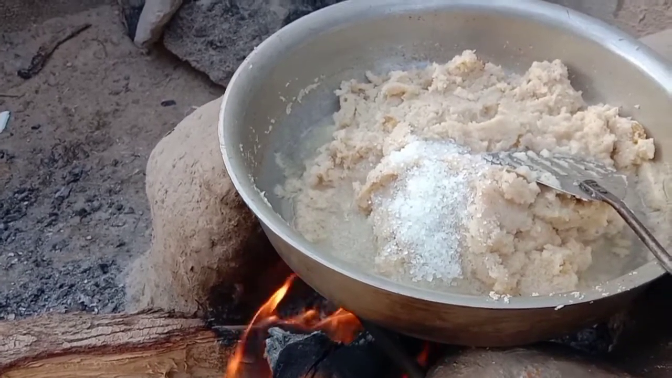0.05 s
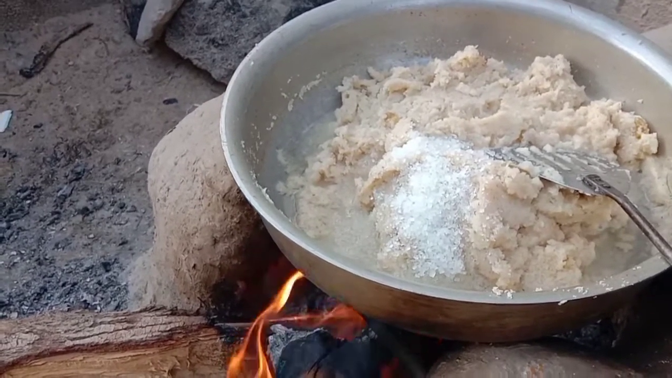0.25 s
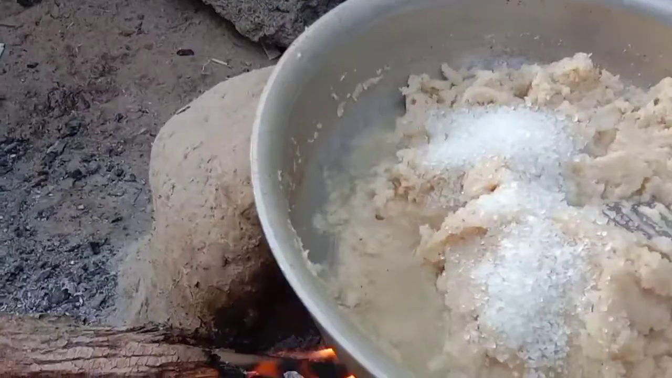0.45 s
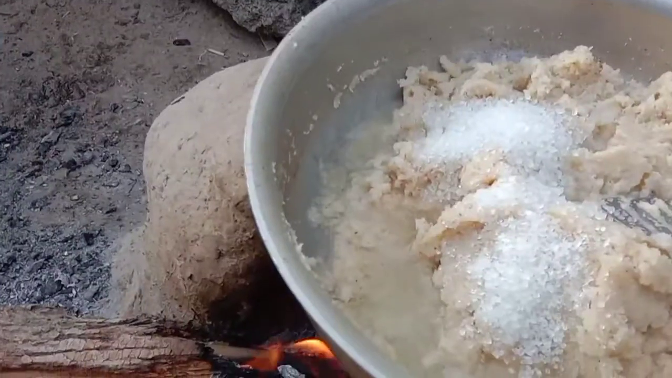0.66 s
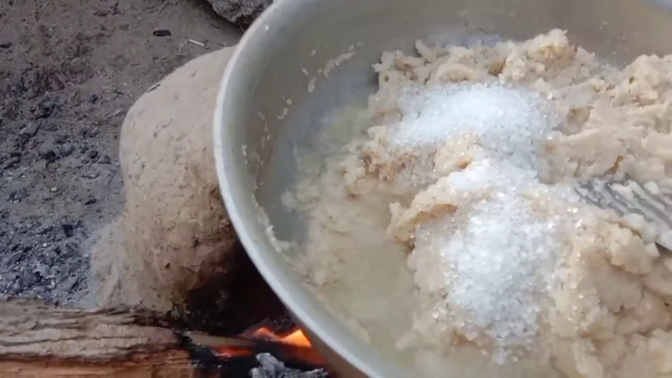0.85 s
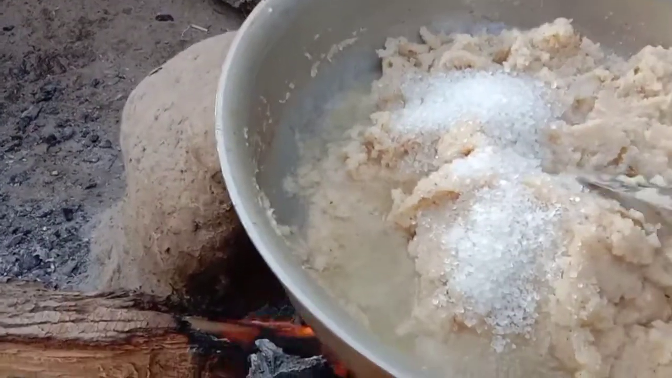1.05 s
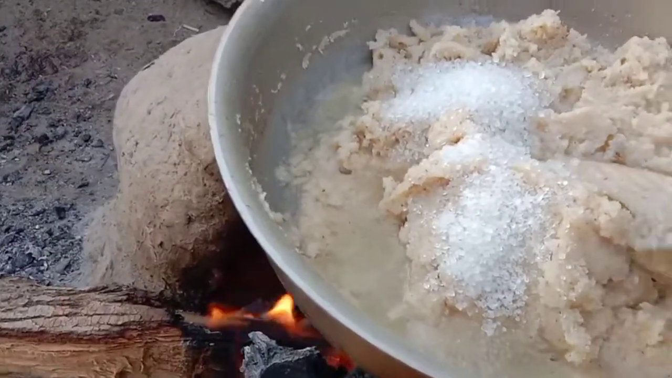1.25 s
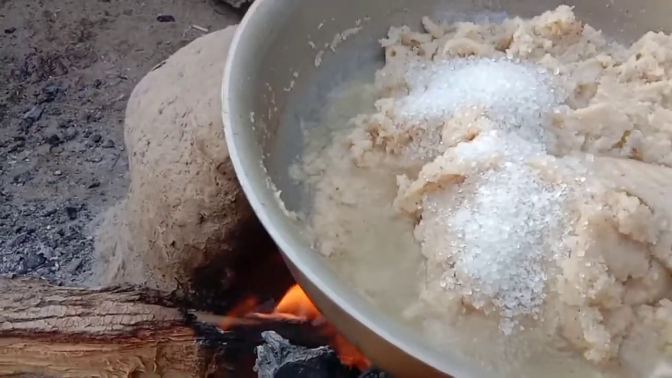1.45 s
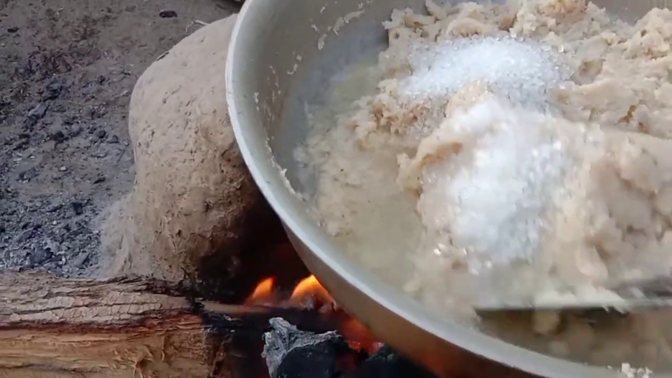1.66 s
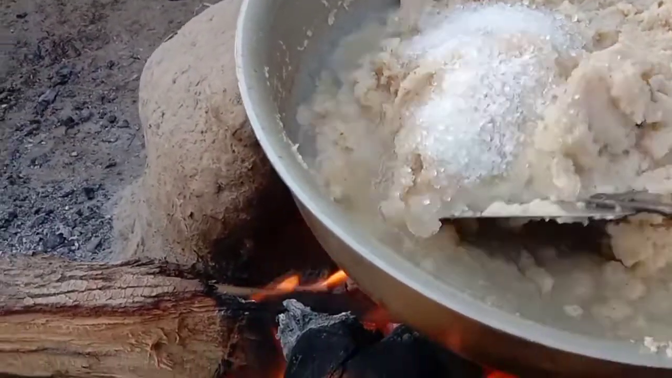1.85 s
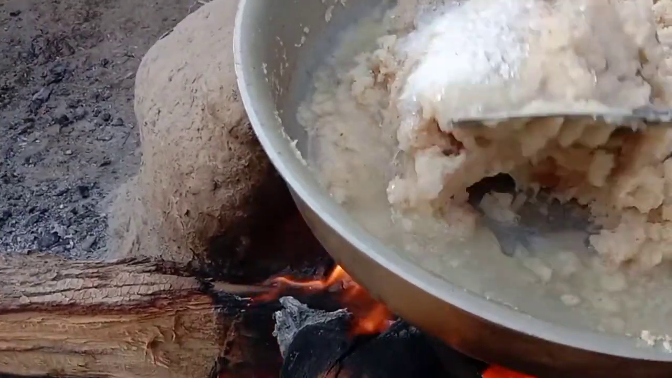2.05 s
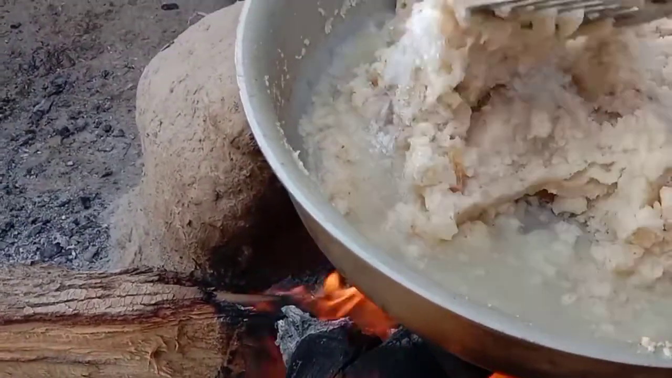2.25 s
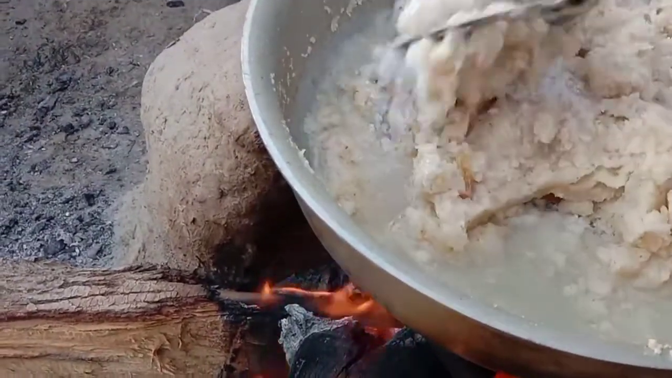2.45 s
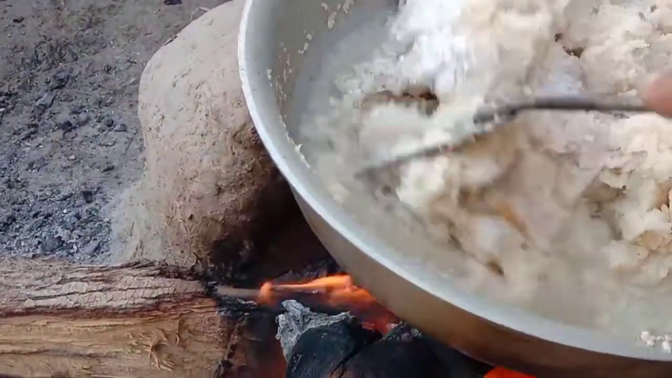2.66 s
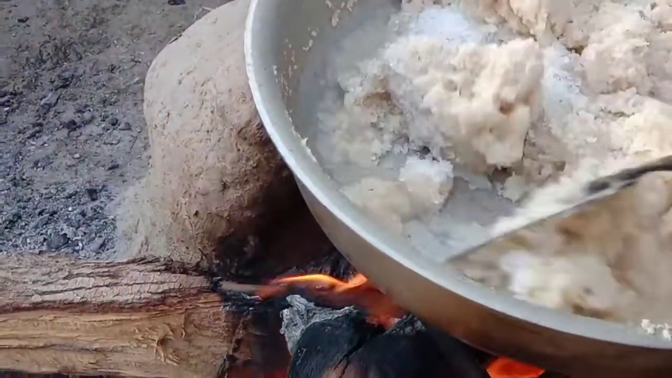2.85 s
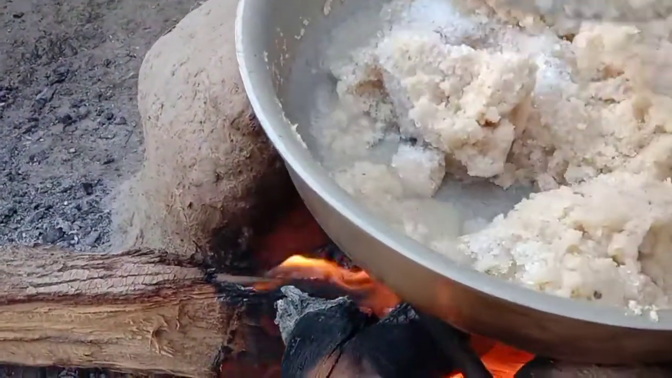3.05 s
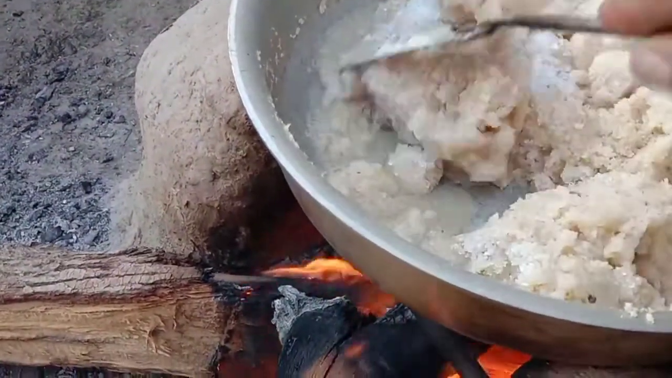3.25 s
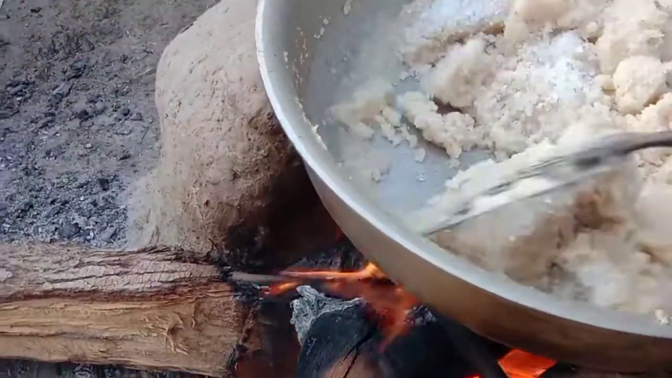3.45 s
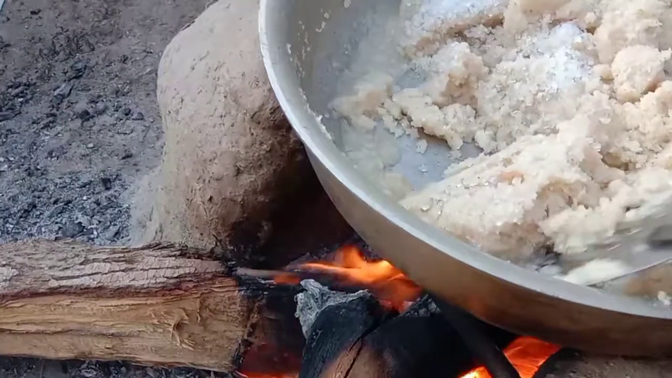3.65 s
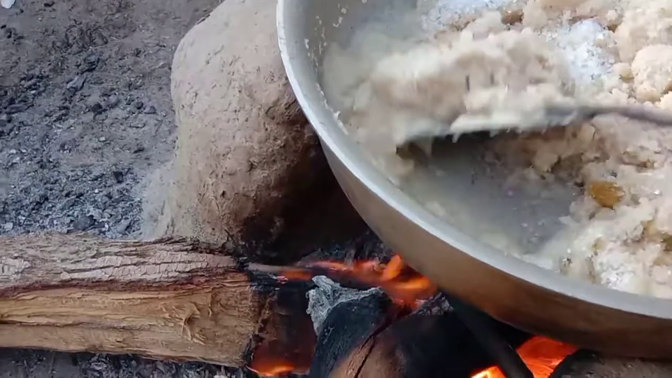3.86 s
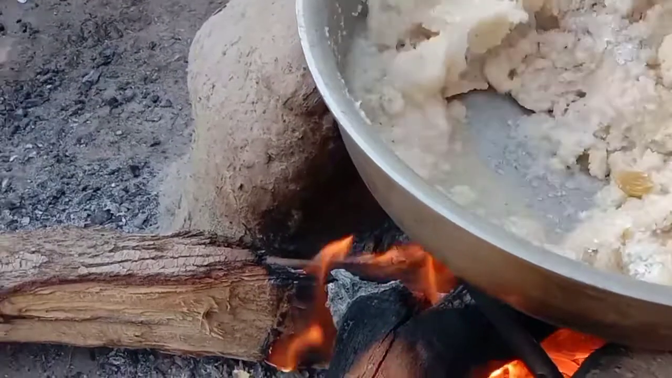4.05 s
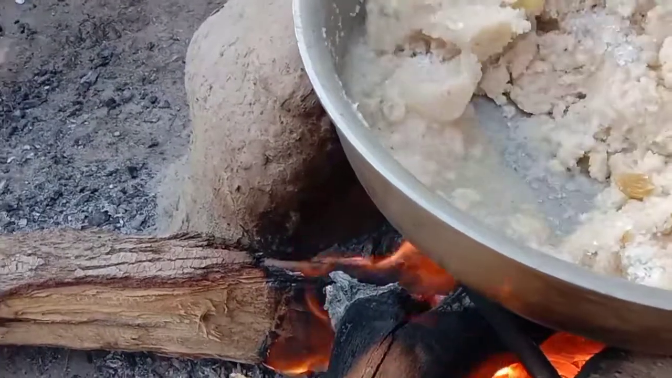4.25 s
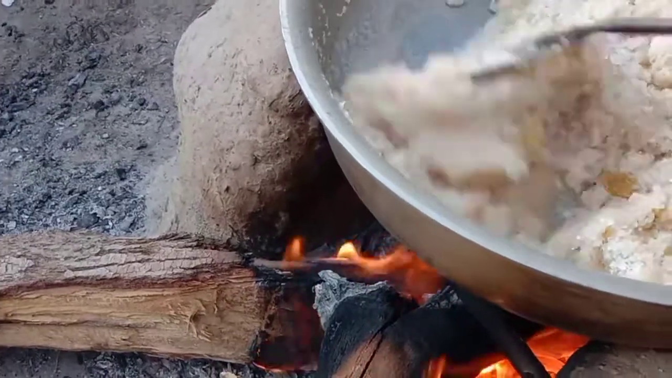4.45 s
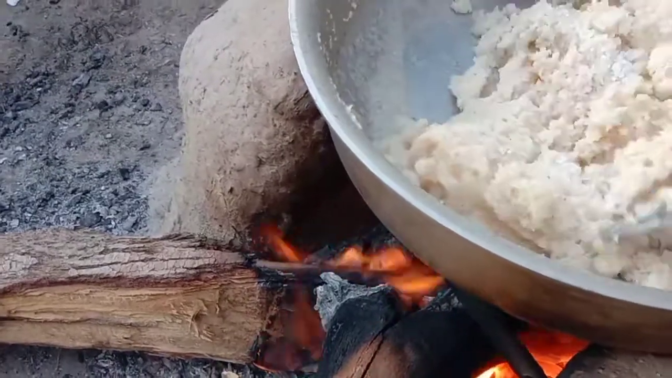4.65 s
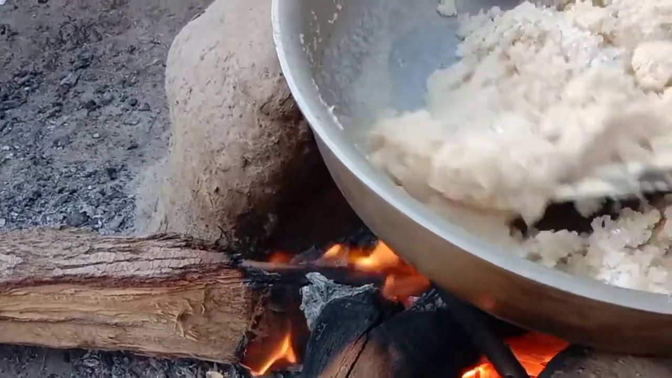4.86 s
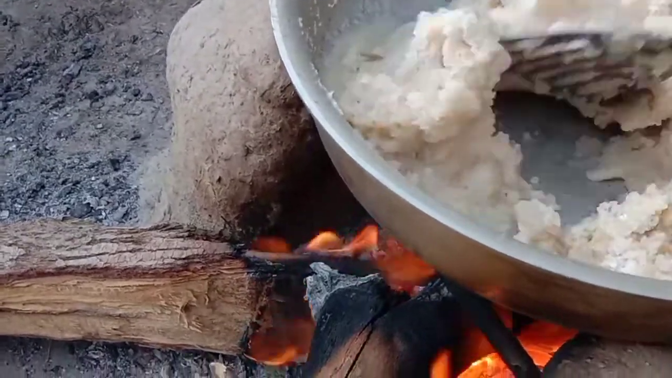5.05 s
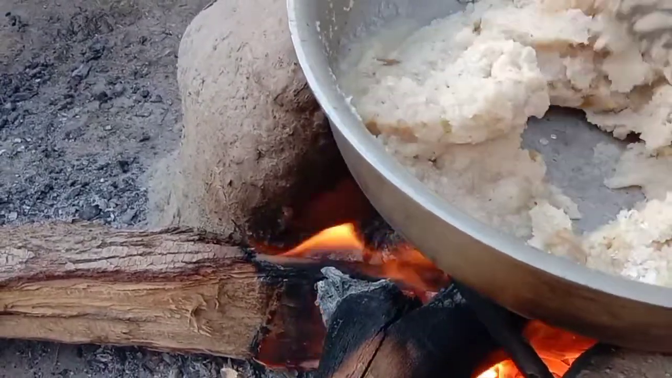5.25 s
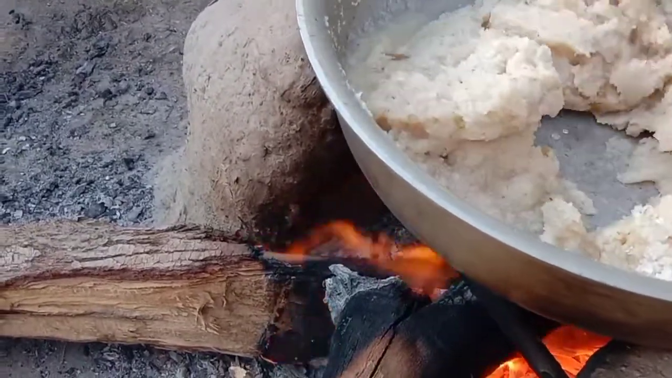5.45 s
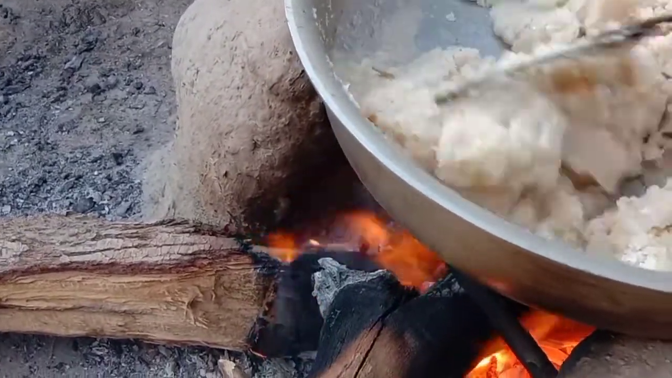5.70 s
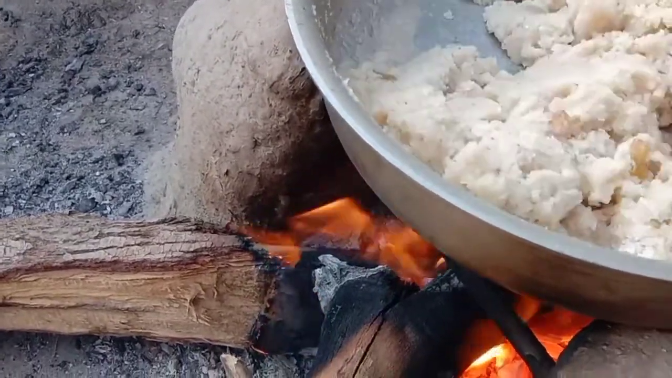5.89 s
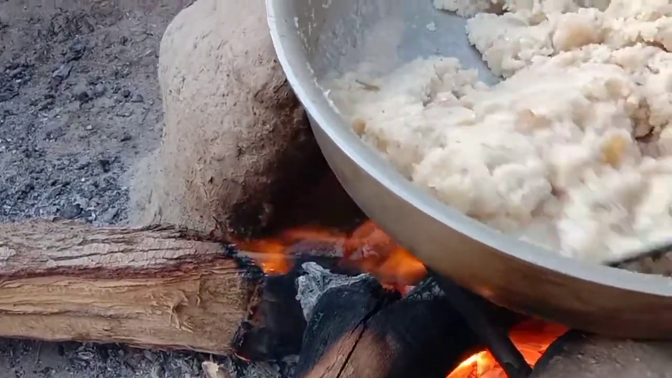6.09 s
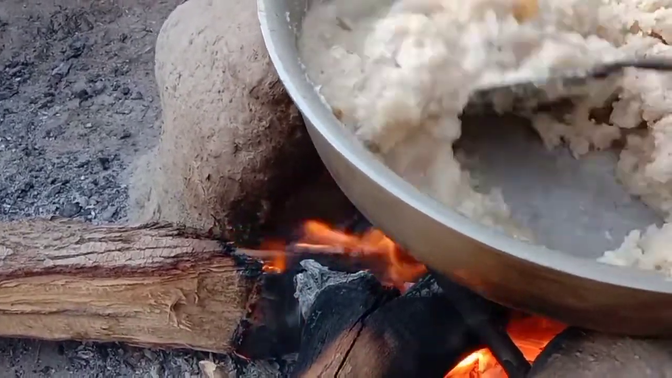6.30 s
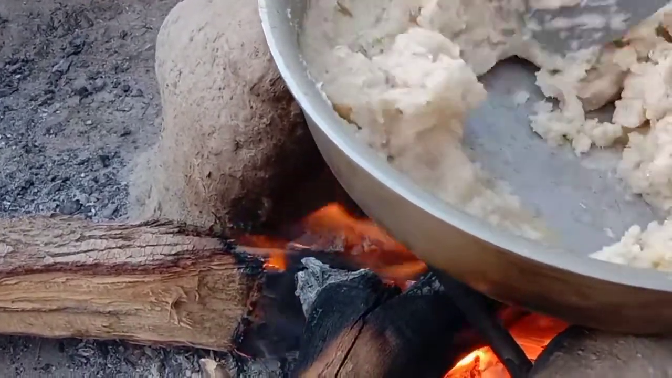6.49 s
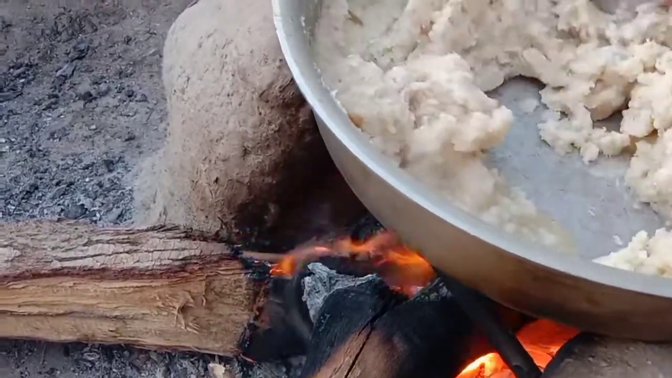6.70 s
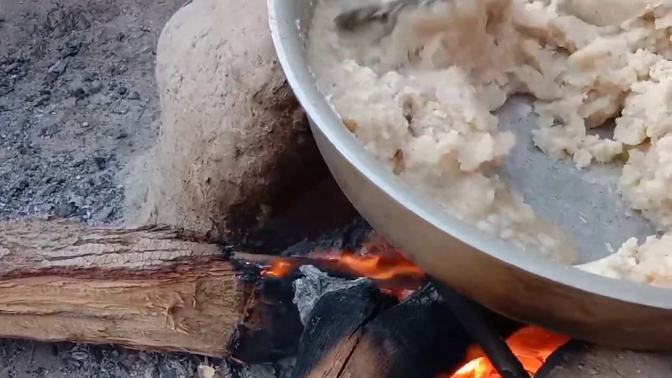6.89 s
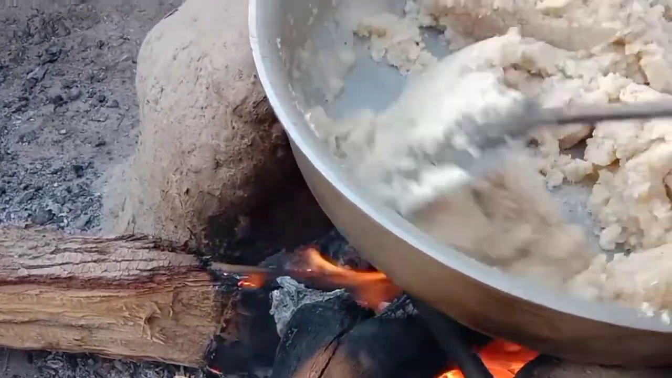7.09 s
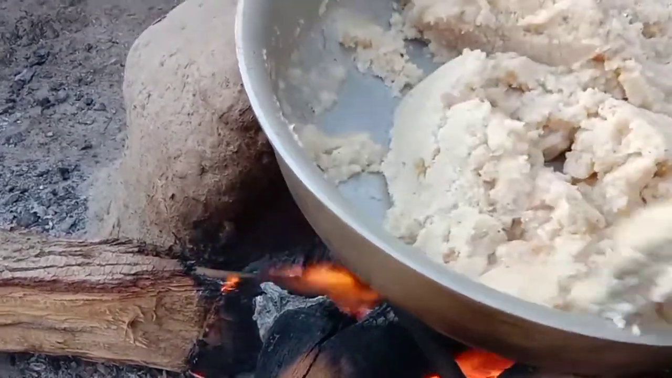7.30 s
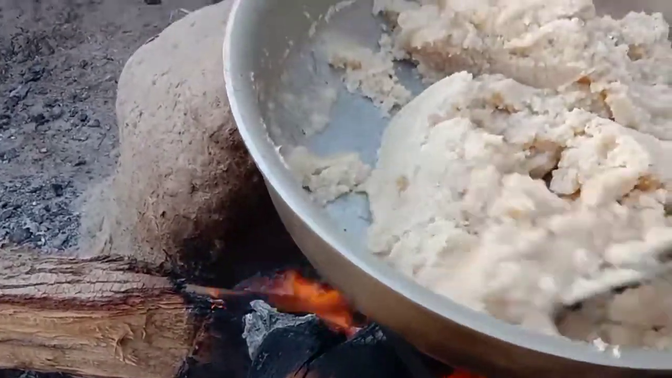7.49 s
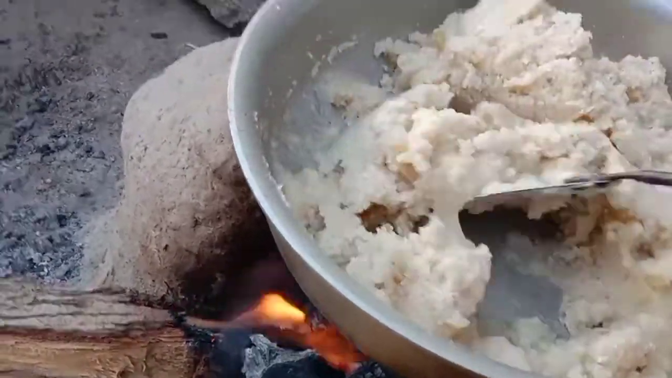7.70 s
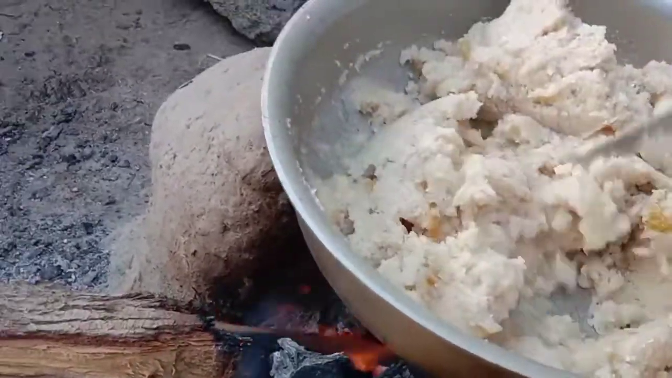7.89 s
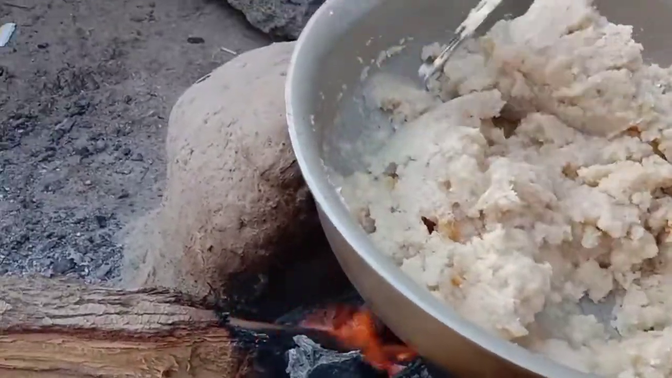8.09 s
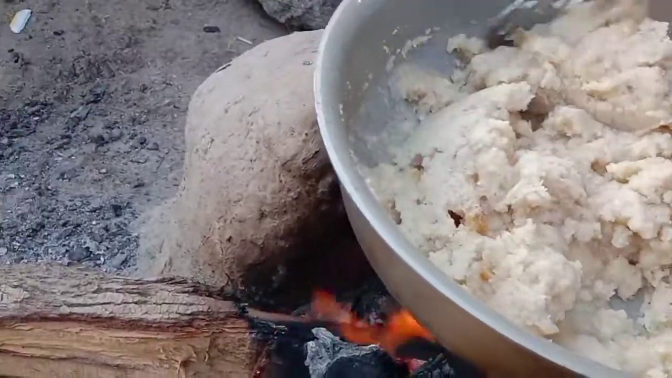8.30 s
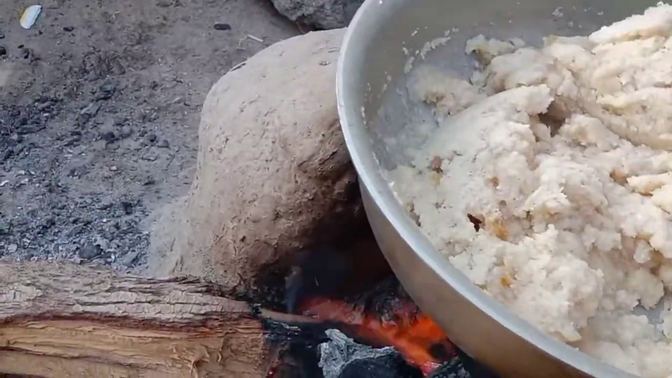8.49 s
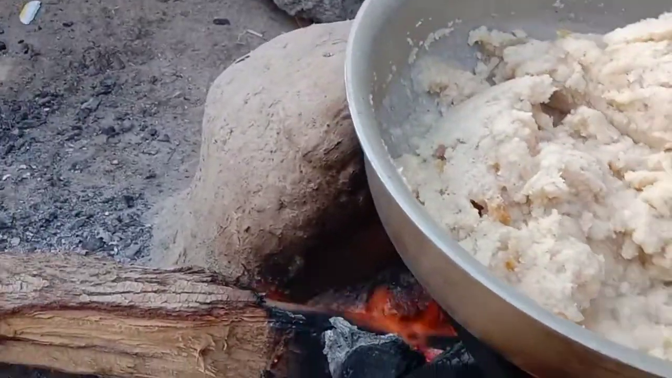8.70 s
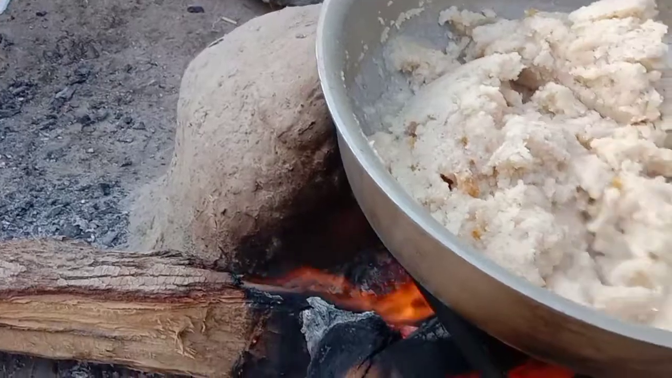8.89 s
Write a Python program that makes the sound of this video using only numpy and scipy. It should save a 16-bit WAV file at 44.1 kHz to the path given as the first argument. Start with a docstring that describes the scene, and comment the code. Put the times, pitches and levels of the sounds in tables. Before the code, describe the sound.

A metal spatula knocks, clinks and scrapes gritty, wet paste in a wide metal pan, with light sizzling and low puffs of wind outdoors.

```python
"""Stirring semolina over a wood fire

Outdoors, close by: a steel spatula turns thick semolina and sugar in a wide metal pan.
The blade knocks on the paste-damped pan, clinks as ringing modes, and scrapes in stick-slip grains over grit.
Filtered bursts of bubbles sizzle throughout; flames and moving air, shaped noise with slowing
low tones, puff low against the microphone. Paste smears and plops, the rim sings, a faint whistle sinks."""
import sys
import numpy as np
from scipy import signal
from scipy.fft import rfft, irfft
from scipy.io import wavfile
from scipy.ndimage import uniform_filter1d, map_coordinates

SR = 44100
rng = np.random.default_rng(int(sys.argv[2]) if len(sys.argv) > 2 else 0)


def unload_audio(sound):
    """Save the sound as a 16-bit wav file, at the path given as the first command line argument."""
    columns = np.transpose(np.atleast_2d(sound))
    # keep every value between -1 and 1, then stretch to whole-number steps
    steps = np.round(np.clip(columns, -1, 1) * 32767)
    wavfile.write(sys.argv[1], SR, steps.astype(np.int16))


N = 394254
T = np.arange(N) / SR
BLOW = T[:SR // 4]  # time axis of a single blow, s


def undb(db):
    """Decibels to gain."""
    return 10 ** (np.asarray(db) / 20)


def unit(x):
    """Scale to rms 1."""
    return x / np.sqrt(np.mean(x ** 2))


def onset_unit(x):
    """Scale a blow to rms 1 over its first hundredth of a second."""
    return x / np.sqrt(np.mean(x[:SR // 100] ** 2))


def curves(table):
    """Each column of a table as a line through time."""
    s, *columns = np.transpose(table)
    return [np.interp(T, s, c) for c in columns]


def add(track, s, sound):
    """Mix a sound in at time s."""
    i = max(int(s * SR), 0)
    track[i:i + len(sound)] += sound[:max(N - i, 0)]


def colour(x, points, size=4096):
    """Causal minimum-phase filter through (f/Hz, level/dB) points."""
    hz, db = np.transpose(points)
    f = np.maximum(np.fft.rfftfreq(size, 1 / SR), 1)
    log_gain = np.log(undb(np.interp(np.log(f), np.log(hz), db)))
    # folding the cepstrum forward puts all of the response after the input
    cepstrum = irfft(log_gain)
    cepstrum[1:size // 2] *= 2
    cepstrum[size // 2 + 1:] = 0
    response = irfft(np.exp(rfft(cepstrum)))
    return signal.oaconvolve(x, response)[:len(x)]


def fade(t60):
    """Exponential decay of a blow, by 60 dB in t60 seconds."""
    return np.exp(-np.log(1000) * BLOW / t60)


def ring(modes, scatter_db, detune):
    """Decaying modes; the place of contact changes their strength, sign and tuning."""
    out = 0
    for hz, t60, db in modes:
        size, shift, side = rng.standard_normal(3)
        gain = np.sign(side) * undb(db + scatter_db * size)
        tone = np.sin(2 * np.pi * hz * (1 + detune * shift) * BLOW)
        out = out + gain * fade(t60) * tone
    return out


def walk(rate):
    """Smooth random wandering with rms 1 and a new target `rate` times a second."""
    knots = rng.standard_normal(4096)
    return unit(np.interp(T * rate, np.arange(len(knots)), knots))


def grains(rate, spread_db):
    """Random tiny impulses, `rate` a second on average; the spread makes a few far larger than the rest."""
    out = np.zeros(N)
    at = np.flatnonzero(rng.random(N) < rate / SR)
    size = rng.exponential(size=N)[at]
    side = rng.random(N)[at] - .5
    out[at] = np.sign(side) * undb(spread_db * np.minimum(size, 5))
    return unit(out)


def rub(drive, modes, rate, detune, glide):
    """Ring a body with a moving contact, which wanders between places that sound differently."""
    place = 1.125 * walk(rate)
    out = 0
    for share in (np.cos(place), np.sin(place)):
        body = ring(modes, scatter_db=4.0, detune=detune)
        out = out + signal.oaconvolve(drive * share, body / np.linalg.norm(body))[:N]
    # the shifting load bends all resonances up and down together
    bend = np.cumsum(glide * walk(rate))
    bend -= uniform_filter1d(bend, SR // 3)
    return map_coordinates(out, [np.arange(N) + bend], order=3, mode="nearest")


# echo between blade and pan: middle delay/s, its relative wandering, level/dB
BOUNCE_S, BOUNCE_SWING, BOUNCE_DB = 0.00058, 0.12, -6


def bounce(x):
    """Sound also arrives by way of the moving blade, so its colour drifts."""
    delay = BOUNCE_S * np.exp(BOUNCE_SWING * walk(rate=5))
    gain = undb(BOUNCE_DB)
    echo = map_coordinates(x, [(T - delay) * SR], order=3, mode="nearest")
    return (x + gain * echo) / np.hypot(1, gain)


# strokes of the blade, before sag and gains: t/s, rise/s, hold/s, release/s,
# pressure on the pan floor level/dB, grit under the blade level/dB, drag of the paste level/dB
STROKES = [(0.497, 0.065, 0.019, 0.11, -65, -90, -101), (1.599, 0.018, 0.041, 0.051, -36.5, -32.5, -40.5),
           (1.661, 0.037, 0.15, 0.16, -38, -39, -52), (1.88, 0.13, 0.17, 0.36, -44, -59, -86),
           (2.107, 0.17, 0.26, 0.17, -47, -48.5, -91), (2.712, 0.025, 0.019, 0.15, -59, -60, -75),
           (3.237, 0.05, 0.15, 0.039, -67, -56, -93), (3.678, 0.061, 0.086, 0.032, -38.5, -40.5, -59),
           (4.101, 0.043, 0.088, 0.14, -86, -62, -74), (4.3, 0.035, 0.12, 0.032, -58.5, -60.5, -71),
           (4.829, 0.025, 0.12, 0.043, -36.5, -37, -47), (5.252, 0.026, 0.51, 0.18, -80, -51.5, -83),
           (5.613, 0.54, 0.03, 0.21, -49.5, -29, -79), (6.064, 0.13, 0.07, 0.1, -33, -36, -48),
           (6.277, 0.037, 0.073, 0.25, -40.5, -34.5, -44.5), (6.606, 0.12, 0.34, 0.19, -49.5, -51.5, -71),
           (7.025, 0.015, 0.11, 0.051, -42, -46.5, -44), (7.294, 0.032, 0.049, 0.079, -65, -37, -73),
           (7.489, 0.016, 0.18, 0.048, -35.5, -33.5, -38), (7.769, 0.13, 0.19, 0.12, -72, -48.5, -60.5),
           (8.185, 0.0082, 0.028, 0.15, -46, -61, -37.5), (8.247, 0.19, 0.02, 0.22, -41.5, -54, -46.5),
           (8.601, 0.08, 0.04, 0.22, -41.5, -49.5, -40), (8.801, 0.057, 0.065, .1, -38, -39, -46),
           (8.903, 0.024, .03, .1, -35.5, -35.5, -50)]
# bubbles stir the pan floor, the grit and the paste: three levels/dB relative to the sizzle table
BUBBLING_DB = (-17, -18.5, -35.5)
# a push eases while it is held (dB/s), then falls over each release time (dB)
STROKE_SAG_DB_PER_S, RELEASE_FALL_DB = 20, 13


def strokes(fry_db):
    """Pressure, grit and drag in dB: over the bubbling, each stroke swells, eases while held and dies away."""
    power = undb(fry_db[:, None] + np.array(BUBBLING_DB)) ** 2
    age = T[:2 * SR, None]
    for s, rise, hold, release, *levels_db in STROKES:
        sag_db = STROKE_SAG_DB_PER_S * np.clip(age - rise, 0, hold)
        release_db = RELEASE_FALL_DB * np.maximum(age - rise - hold, 0) / release
        shape = np.clip(age / rise, 0, 1) ** 1.87 * undb(-sag_db - release_db)
        add(power, s, (undb(levels_db) * shape) ** 2)
    return 10 * np.log10(power.T)


# modes of the loaded pan: f/Hz, t60/s, relative level/dB
PAN_MODES = [(401, 0.034, -12.5), (702, 0.085, -5.5), (768, 0.12, -11.5), (776, 0.068, 0.5),
             (883, 0.02, 4.5), (985, 0.088, 0.5), (1158, 0.017, 1), (1221, 0.048, 4.5), (1342, 0.059, 10),
             (1454, 0.11, -8), (1660, 0.046, -0.5), (1707, 0.041, -4), (2085, 0.12, -5)]
# pan modes that a hard-pressed blade locks onto: f/Hz, t60/s, relative level/dB
SCREECH_MODES = [(1215, 0.06, -11), (1299, 0.13, -15), (1352, 0.056, -6), (1490, 0.038, -23)]
# higher modes of the pan wall, reached by sharp grit: f/Hz, t60/s, relative level/dB
WALL_MODES = [(1474, 0.03, -2), (2110, 0.012, 3), (2380, 0.02, 3), (2676, 0.019, 4.5), (3028, 0.048, 0),
              (3316, 0.02, 11), (3676, 0.045, -4), (4634, 0.02, 5.5), (4860, 0.02, 2.5), (5193, 0.021, 7),
              (5554, 0.024, 5.5), (5840, 0.023, 7.5), (6660, .018, 3), (7200, 0.019, -14)]
# the pan floor under a dragged lump: f/Hz, t60/s, relative level/dB
PASTE_MODES = [(302, 0.03, -1.5), (365, 0.032, 4), (443, 0.058, 1.5), (538, 0.01, -3), (698, 0.018, -11),
               (835, 0.038, 4), (912, 0.044, 4), (1113, 0.024, -8.5), (2680, 0.0054, -19)]
# spectrum of crushed grit: f/Hz, relative level/dB
GRIT_SPECTRUM = [(1200, -51), (1850, 1.5), (2400, -17.5), (2750, 2), (3350, 3.5), (4000, 3), (5200, -2),
                 (7000, -19.5), (10000, -51)]
# spectrum of the edge rasping over metal: f/Hz, relative level/dB
RASP_SPECTRUM = [(350, -13.5), (600, -14.5), (800, 1), (1350, 4.5), (1850, -5.5), (2400, -2.5), (3400, -4),
                 (4300, -10), (5800, -10.5), (8000, -7.5), (14000, -33)]
# a blade pressed harder than LOCK_DB starts to screech, fully so LOCK_RANGE_DB above it
LOCK_DB, LOCK_RANGE_DB, SCREECH_DB = -44.5, 13, 7
CRUNCH_DB = -6.5  # single sugar crystals that crack under the edge, relative to the fine grit


def scrape(pressure_db, grit_db, paste_db):
    """The blade sticks and slips: slips rasp and ring the pan, crush sugar and drag the paste along."""
    # a light stroke glides on syrup; a heavy one judders
    bite = np.interp(pressure_db, [-55, -35], [.7, 1])
    judder = undb(2.3 * bite * walk(rate=130) + 1.4 * walk(rate=25))
    slips = unit(grains(rate=7000, spread_db=1.8) * judder)
    crunch = undb(CRUNCH_DB) * grains(rate=140, spread_db=1.8)
    crush = unit((grains(rate=9000, spread_db=2.6) + crunch) * judder)
    drag = unit(grains(rate=2500, spread_db=4.5) * judder)

    pan = rub(slips * undb(pressure_db - 1.5), PAN_MODES, rate=6, detune=0.026, glide=0.0079)
    locked = np.clip((pressure_db - LOCK_DB) / LOCK_RANGE_DB, 0, 1)
    screech_drive = slips * locked * undb(pressure_db + SCREECH_DB)
    screech = rub(screech_drive, SCREECH_MODES, rate=18, detune=0.007, glide=0.025)
    wall = rub(crush * undb(grit_db), WALL_MODES, rate=12, detune=0.017, glide=0.025)
    paste = rub(drag * undb(paste_db), PASTE_MODES, rate=4.6, detune=0.012, glide=0.028)
    grit = unit(colour(crush, GRIT_SPECTRUM)) * undb(grit_db - 7.0)
    rasp = unit(colour(slips, RASP_SPECTRUM)) * undb(pressure_db - 7.5)
    return pan + screech + wall + paste + bounce(grit + rasp)


# blade knocks on the pan: t/s, thud level/dB, pan ring level/dB, crack level/dB
KNOCKS = [(1.613, -23, -29, -23.5), (1.641, -52, -43, -35), (1.927, -64, -44, -41), (3.706, -33, -30, -37),
          (3.723, -21.5, -24.5, -32), (4.846, -20.5, -19.5, -23), (5.505, -19.5, -35, -23.5),
          (6.089, -21.5, -17.5, -20.5), (6.116, -31.5, -24.5, -35), (6.315, -57, -31, -29.5),
          (7.046, -33, -27, -33), (7.475, -19.5, -15, -24), (7.511, -45, -42, -37),
          (7.542, -35, -28, -35.5), (7.607, -56, -28.5, -31.5), (7.641, -26.5, -29, -33),
          (7.676, -39, -29.5, -31), (8.194, -34.5, -27, -22), (8.231, -40.5, -38, -40),
          (8.86, -37, -24.5, -29), (8.912, -44, -30, -39)]
# spectrum of a thud: f/Hz, relative level/dB
THUD_SPECTRUM = [(60, -35), (180, -13), (340, 1), (480, -5.5), (700, -1.5), (1200, -3), (3000, -56)]
# spectrum of a metal crack: f/Hz, relative level/dB
CRACK_SPECTRUM = [(900, -40.5), (1900, -6.5), (2600, -4.5), (3400, -3), (4200, -6), (5600, 3), (7000, -4),
                  (9500, -13), (15500, -13.5)]


def knocks():
    """Each knock is a thud of the loaded pan, its short ring and a crack of metal on metal."""
    out = np.zeros(N)
    # the blade sinks through paste, so the contact takes a moment to build
    contact = 1 - np.exp(-BLOW / 0.00086)
    for s, thud_db, ring_db, crack_db in KNOCKS:
        noise = rng.standard_normal((2, len(BLOW))) * contact
        thud = colour(noise[0] * (fade(0.01) + undb(-22.0) * fade(0.11)), THUD_SPECTRUM)
        crack = colour(noise[1] * (fade(0.0033) + undb(-17) * fade(0.026)), CRACK_SPECTRUM)
        # the pressed blade chokes the pan's ring
        choke = fade(0.01) + undb(-16.5)
        body = ring(PAN_MODES, scatter_db=-6.5, detune=0.029) * contact * choke
        add(out, s, undb(thud_db) * onset_unit(thud))
        add(out, s, undb(ring_db) * onset_unit(body))
        add(out, s, undb(crack_db) * onset_unit(crack))
    return out


# the free blade clinks: t/s, gains of its low, middle and high modes, each level/dB
CLINKS = [(1.49, -22.5, -27, -26.5), (1.505, -17.5, -13.5, -22), (1.525, -20, -22, -39),
          (3.613, -25, -22, -33), (4.924, -26.5, -45, -32), (5.936, -29.5, -33, -33),
          (7.293, -24.5, -22.5, -28), (7.454, -30, -28, -31), (8.195, -23, -33, -17.5)]
# modes of the spatula blade: f/Hz, t60/s, relative level/dB
BLADE_MODES = [(788, 0.13, -13.5), (1537, 0.13, -6.5), (1627, 0.08, -22.5), (2440, 0.12, -10.5),
               (2553, 0.077, -18), (3324, 0.049, -4.5), (3375, 0.07, -4), (4434, 0.12, -22.5),
               (5220, 0.026, -7), (5470, .08, -23), (5670, 0.081, -1.5), (6020, 0.062, 2),
               (6500, 0.04, -11), (6860, .08, -3.5), (7520, 0.05, -7.5), (8500, 0.1, -15),
               (10740, 0.027, -8.5), (14900, .06, -16)]


def clinks():
    """A glancing touch ticks, rings the free blade and rattles it against the metal, all at once."""
    out = np.zeros(N)
    for s, *band_db in CLINKS:
        modes = [(hz, t60, db + np.interp(hz, [2400, 3300, 5400], band_db)) for hz, t60, db in BLADE_MODES]
        touch = rng.standard_normal(len(BLOW)) * (fade(.012) + undb(-1.0) * fade(0.12))
        tick = onset_unit(colour(touch, CRACK_SPECTRUM))
        # part of the ring dies as soon as the blade settles in the paste
        settle = fade(.05) + undb(-9)
        # the edge buzzes against the metal while it rings
        wobble = unit(uniform_filter1d(rng.standard_normal(len(BLOW)), SR // 300))
        buzz = 1 + .6 * (1 - fade(.06)) * wobble
        tone = ring(modes, scatter_db=1.5, detune=0.0048) * settle * buzz
        chatter = grains(rate=2900, spread_db=0.0)[:len(BLOW)] * fade(0.61)
        rattle = onset_unit(colour(chatter, RASP_SPECTRUM))
        add(out, s, tone + undb(band_db[-1] - 5.5) * tick + undb(band_db[0] - 24.0) * rattle)
    return out


# the blade's edge skids on bare metal: t/s, length/s, drive level/dB
SKIDS = [(1.53, 0.067, -36), (1.623, 0.043, -38.5), (3.64, 0.05, -42), (7.302, 0.099, -32),
         (7.415, 0.059, -43), (7.505, 0.081, -39), (7.591, 0.057, -30.5)]
SKID_TILT_DB = -2.5  # per octave: pressure damps the blade's high modes


def skids():
    """Rapid chatter of the edge keeps the blade ringing."""
    force = np.zeros(N)
    for s, length, db in SKIDS:
        add(force, s, undb(db) * signal.windows.tukey(int(length * SR)))
    # pressed to the pan, the blade loses its slowest flexing mode and much of its top
    lowest_hz = BLADE_MODES[0][0]
    modes = [(hz, t60, db + SKID_TILT_DB * np.log2(hz / lowest_hz)) for hz, t60, db in BLADE_MODES[1:]]
    return rub(force * grains(rate=1500, spread_db=4.0), modes, rate=30, detune=0.01, glide=0.006)


# the blade is drawn out of the heap: t/s, rise/s, release/s, hollow drive level/dB, hiss level/dB
DRAW = (1.09, .13, .2, -45.5, -54)
# the hollow that it leaves: f/Hz, t60/s, relative level/dB
HOLLOW_MODES = [(377, .04, -7), (480, .025, -12), (740, .02, -10), (877, .04, 0), (1130, .03, -7),
                (1400, .025, -5), (1560, .04, -9), (1710, .04, -12)]
# spectrum of paste sliding off the blade: f/Hz, relative level/dB
SLIDE_SPECTRUM = [(1900, -27), (2350, -9), (2680, 1), (3000, -7), (3350, -4), (3700, -6.5), (4400, -20),
                  (8000, -29.5)]


def draw():
    """The blade slides out of the heap: a soft hiss and a hollow resonance swell together; the hollow fades slower."""
    s, rise, release, hollow_db, hiss_db = DRAW
    age = T - s
    shape = np.clip(age / rise, 0, 1) * undb(-RELEASE_FALL_DB * np.maximum(age - rise, 0) / release)
    friction = rng.standard_normal(N)
    hollow_drive = friction * shape ** 0.56 * undb(hollow_db)  # a power below 1 rises sooner, fades slower
    hollow = rub(hollow_drive, HOLLOW_MODES, rate=7, detune=.008, glide=.018)
    return hollow + unit(colour(friction, SLIDE_SPECTRUM)) * shape * undb(hiss_db)


# wet paste smears and sucks around the blade, a pocket of air changing size:
# t/s, length/s, start f/Hz, end f/Hz, width/Hz, level/dB
SMEARS = [(0.227, 0.27, 1440, 1740, 300, -70.5), (0.257, .1, 2060, 2450, 250, -75),
          (.395, 0.038, 2490, 2800, 700, -67), (0.496, .14, 2520, 1850, 453, -74.5),
          (0.557, .08, 1046, 850, 200, -71), (2.763, 0.085, 1150, 1440, 350, -62.5),
          (2.861, 0.19, 1970, 2460, 300, -72), (2.889, 0.14, 790, 830, 50, -70),
          (3.278, .06, 920, 860, 120, -69), (3.287, .05, 1400, 1600, 300, -65),
          (3.359, 0.063, 1390, 1530, 300, -65.5), (3.35, .09, 2700, 3400, 800, -59),
          (3.94, .12, 790, 860, 90, -63.5), (3.949, .11, 1400, 1340, 150, -68),
          (4.317, .14, 1158, 1506, 300, -64), (4.334, .14, 2120, 2690, 500, -64.5),
          (5.271, 0.21, 1263, 1366, 90, -64), (5.921, .16, 850, 1305, 445, -50.5),
          (7.07, .08, 1092, 842, 400, -46), (8.38, .05, 2200, 2400, 400, -51),
          (8.435, .04, 1100, 1500, 800, -43), (8.65, .1, 900, 1100, 550, -42)]
SMEAR_OVERTONE, SMEAR_OVERTONE_DB = 1.9, -18  # the pocket's second resonance: ratio to the first, level


def smears():
    """Paste rubs past a pocket of air, whose resonance slides as the blade opens or closes it."""
    out = np.zeros(N)
    for s, length, start_hz, end_hz, width_hz, db in SMEARS:
        count = int(length * SR)
        phase = 2j * np.pi * np.cumsum(np.geomspace(start_hz, end_hz, count)) / SR
        # slow complex noise blurs each resonance to its width
        blur = signal.butter(2, width_hz / 2, fs=SR, output="sos")
        noise = rng.standard_normal((2, count)) + 1j * rng.standard_normal((2, count))
        first, second = signal.sosfilt(blur, noise)
        overtone = undb(SMEAR_OVERTONE_DB) * second * np.exp(SMEAR_OVERTONE * phase)
        pocket = first * np.exp(phase) + overtone
        add(out, s, undb(db) * unit(pocket.real * signal.windows.tukey(count, .7)))
    return out


# a lump lets go of the blade with a falling groan: t/s, length/s, start f/Hz, end f/Hz, level/dB
SQUELCHES = [(1.815, .03, 420, 300, -35), (3.835, .025, 380, 280, -40), (6.315, .05, 900, 720, -37),
             (6.365, .085, 430, 230, -38)]


def squelches():
    """Sticky paste tears free; its rough note sinks as the cavity opens."""
    out = np.zeros(N)
    for s, length, start_hz, end_hz, db in SQUELCHES:
        count = int(length * SR)
        hz = np.geomspace(start_hz, end_hz, count)
        rough = unit(uniform_filter1d(rng.standard_normal(count), SR // 200))
        groan = unit(rough * np.sin(2 * np.pi * np.cumsum(hz) / SR))
        add(out, s, undb(db) * signal.windows.tukey(count) * groan)
    return out


# pockets of steam pop softly in the paste: t/s, f/Hz, level/dB
PLOPS = [(5.607, 1410, -48), (8.296, 1480, -41.5), (8.523, 925, -35), (8.607, 1040, -37), (8.631, 950, -34),
         (8.726, 955, -40)]


def plops():
    """Each pocket bursts as soft-edged noise, coloured by its cavity in the paste."""
    out = np.zeros(N)
    for s, hz, db in PLOPS:
        envelope = (1 - np.exp(-BLOW / .002)) * (fade(.03) + undb(-16) * fade(.12))
        burst = rng.standard_normal(len(BLOW)) * envelope
        cavity = [(hz / 3, -18), (hz / 1.46, -6), (hz, 0), (hz * 1.3, -8), (hz * 3, -24), (hz * 8, -40)]
        add(out, s, undb(db) * onset_unit(colour(burst, cavity)))
    return out


# the rim sings on: t/s, level/dB
RIM = [(6.2, -72), (6.33, -54), (6.8, -52), (7.2, -54), (7.35, -48), (7.8, -51), (8.17, -55), (8.3, -65)]
RIM_HZ = 1082  # before the load of the paste
RIM_WIDTH_HZ, RIM_ROUGH = 46, 0.39  # the blade's irregular nudges blur the note: rate, relative depth


def rim():
    """One lightly damped mode of the bare rim, nudged unevenly by the stirring."""
    s, db = np.transpose(RIM)
    gain = np.interp(T, s, undb(db), left=0, right=0)
    # paste spreading up the wall lowers the note a little
    hz = RIM_HZ * np.interp(T, [6.9, 7.4], [1.01, .998])
    nudges = 1 + RIM_ROUGH * (walk(RIM_WIDTH_HZ) + 1j * walk(RIM_WIDTH_HZ))
    return gain * unit(np.imag(nudges * np.exp(2j * np.pi * np.cumsum(hz) / SR)))


# syrup on hot metal, before the gains below: t/s, sizzle level/dB, fine spray level/dB
SIZZLE = [(0.0, -65, -65), (.14, -61, -74), (.3, -56, -71), (.62, -57.5, -67), (1.54, -55.5, -69),
          (1.67, -52, -57), (2.21, -44, -52.5), (3.01, -57, -65.5), (3.68, -53.5, -54.5),
          (3.98, -55, -62.5), (4.81, -45.5, -52), (5.43, -49.5, -59), (6.15, -37.5, -47),
          (6.65, -47.5, -53), (7.32, -46.5, -52.5), (7.5, -39, -71), (7.69, -41.5, -47.5), (8.12, -57, -58),
          (8.42, -42.5, -51), (8.94, -46, -65)]
# flurries of fine spray: t/s, length/s, added level/dB
FLURRIES = [(.635, .06, -52), (1.72, .26, -40)]
# spectrum of frying: f/Hz, relative level/dB
FRY_SPECTRUM = [(2500, -44), (4200, -22.5), (5000, 1.5), (5650, 5.5), (6600, 2.5), (7600, 0.5),
                (9500, -8.5), (12000, -17.5), (16000, -52.5)]
# spectrum of fine spray: f/Hz, relative level/dB
SPRAY_SPECTRUM = [(6000, -64.5), (9500, -15), (11000, -13), (13000, -10), (15400, -5.5)]
FRY_DB, SPRAY_DB = -4, 3.5  # gains of the two kinds of bubble
# a stroke spreads syrup on bare metal: dB at 0 dB of grit, dB per dB of grit, its spray relative to it
FLARE_DB, FLARE_SLOPE, FLARE_SPRAY_DB = -25.5, 0.55, -5


def sizzle(fry_db, spray_db, grit_db):
    """Countless small bubbles burst in the syrup, more loudly where the blade bares hot metal; some spit."""
    flare = undb(FLARE_DB + FLARE_SLOPE * grit_db) * np.clip((grit_db + 61.5) / 15, 0, 1)
    spits = grains(rate=120, spread_db=3.5)
    bursts = unit(grains(rate=9800, spread_db=3.4) + undb(-5) * spits)
    flicker = undb(2.2 * walk(rate=30) + 1.0 * walk(rate=8))
    fry = unit(colour(bursts, FRY_SPECTRUM)) * np.hypot(undb(fry_db + FRY_DB), flare) * flicker
    # the finest spray comes in flurries
    mist = np.hypot(undb(spray_db + SPRAY_DB), flare * undb(FLARE_SPRAY_DB))
    for s, length, db in FLURRIES:
        add(mist, s, undb(db) * np.hanning(int(length * SR)))
    spray = unit(colour(bursts, SPRAY_SPECTRUM)) * mist * flicker * undb(0.81 * walk(rate=10))
    return fry + spray


# single sharp ticks from the pan: t/s, level/dB
TICKS = [(2.726, -51.5), (2.877, -49.5), (2.968, -50.5), (3.278, -48), (4.73, -37), (5.375, -43),
         (5.801, -38), (5.825, -38.5), (5.872, -32), (5.985, -33), (6.022, -33.5), (6.542, -37.5),
         (6.588, -37.5), (7.86, -39.5), (8.306, -43)]


def ticks():
    """Single sharp ticks: sugar grit cracking, small touches of the blade or spitting syrup."""
    out = np.zeros(N)
    for s, db in TICKS:
        snap = rng.standard_normal(len(BLOW)) * (fade(0.00097) + undb(-18) * fade(0.056))
        tick = colour(snap, FRY_SPECTRUM) + undb(-1.5) * colour(snap, CRACK_SPECTRUM)
        add(out, s, undb(db) * onset_unit(tick))
    return out


# puffs of air against the microphone: t/s, peak level/dB, nominal f/Hz, length of the flutter/s
PUFFS = [(1.081, -27, 131, 0.1), (1.305, -27.5, 90.3, 0.041), (1.68, -31.5, 110, 0.088),
         (1.816, -23, 171, 0.12), (1.957, -30, 92, 0.032), (2.284, -32.5, 105, 0.16),
         (2.539, -37.5, 113, 0.018), (2.853, -36.5, 106, 0.13), (3.19, -37.5, 110, 0.018),
         (3.25, -31, 110, 0.12), (3.502, -27, 108.5, 0.052), (3.834, -23, 160, 0.034),
         (3.946, -31.5, 99, 0.098), (4.251, -31, 110, 0.034), (4.427, -35, 108, 0.12),
         (4.662, -22.5, 102.7, 0.029), (4.788, -28.5, 109, 0.06), (4.865, -16.5, 107, 0.053),
         (5.085, -19, 113.6, 0.029), (5.223, -22.5, 112, 0.039), (5.591, -24.5, 102, 0.092),
         (6.01, -29.5, 118, 0.063), (6.313, -25, 95, 0.034), (6.5, -34, 87, 0.037),
         (6.757, -17, 111, 0.026), (6.992, -26.5, 127, 0.014), (7.153, -18.5, 110, 0.067),
         (7.277, -17.5, 100, 0.045), (7.402, -23.5, 86, 0.11), (7.571, -20.5, 99, 0.11),
         (7.756, -30.5, 109, 0.049), (8.04, -25.5, 100, 0.053), (8.209, -25.5, 103, 0.13),
         (8.36, -16.5, 125, 0.086), (8.74, -24.5, 87, 0.065)]
# draught around the fire, before its gain and flutter: t/s, level/dB
DRAUGHT = [(0.0, -67), (0.94, -74), (1.19, -51), (1.57, -59), (1.84, -36.5), (1.97, -56.5), (2.79, -67.5),
           (4.2, -50.5), (4.98, -41), (6.05, -55.5), (6.62, -37), (7.52, -37.5), (7.89, -52.5), (8.46, -44),
           (8.94, -52)]
# spectrum of moving air: f/Hz, relative level/dB
AIR_SPECTRUM = [(15, -63.5), (35, -27.5), (60, -4.5), (90, 0.5), (130, -2.5), (190, -12.5), (270, -30.5),
                (450, -48.5), (1200, -81.5)]
# spectrum of small eddies: f/Hz, relative level/dB
GUST_SPECTRUM = [(60, -7), (130, -7.5), (200, 10.5), (280, -2), (380, -14), (600, -54), (1200, -60.5)]
# spectrum of the fire's rumble: f/Hz, relative level/dB
HEARTH_SPECTRUM = [(15, -7.5), (35, 4), (80, 10), (160, -11.5), (300, -11), (520, -19), (900, -43.5)]
FLUTTER_DB = -10.5  # turbulence in a puff, relative to its peak
DRAUGHT_DB = 1  # gain


def air():
    """A fluttering draught over the fire's low rumble; each puff is a short eddy in a burst of turbulence."""
    draught_db, = curves(DRAUGHT)
    flow = undb(draught_db + DRAUGHT_DB + 3.7 * walk(rate=28))
    out = unit(colour(rng.standard_normal(N), HEARTH_SPECTRUM)) * undb(-67.0)
    for s, db, hz, length in PUFFS:
        add(flow, s, undb(db + FLUTTER_DB) * signal.windows.tukey(int(length * SR), .7))
        age = BLOW / 0.012  # the swell peaks after 12 ms
        swell = (age * np.exp(1 - age)) ** 4
        # the eddy slows as it spreads
        turns = np.cumsum(hz * (0.728 + 0.92 * fade(0.077))) / SR
        add(out, s, undb(db) * swell * np.sin(2 * np.pi * (turns + rng.random())))
    out += unit(colour(rng.standard_normal(N), AIR_SPECTRUM)) * flow
    # stronger flow breaks into smaller eddies, which sound higher
    gusts = unit(colour(rng.standard_normal(N), GUST_SPECTRUM)) * flow ** 1.496 * undb(4.5)
    return out + gusts


# a faint whistle sinks in pitch: t/s, length/s, middle start f/Hz, middle end f/Hz
WHISTLE = (.46, .54, 1400, 1100)
WHISTLE_DB = -67  # middle of its wavering peak level


def whistle():
    """A thin, unsteady, far-off note that slides down."""
    s, length, start_hz, end_hz = WHISTLE
    part = np.clip((T - s) / length, 0, 1)
    waver = 1 + .025 * walk(rate=14) + .07 * walk(rate=300)
    hz = start_hz * (end_hz / start_hz) ** part * waver
    gain = undb(WHISTLE_DB + 2.8 * walk(rate=40)) * 2 * np.sqrt(part * (1 - part))
    return gain * np.sin(2 * np.pi * np.cumsum(hz) / SR)


def scene():
    """The pan is close and in the open air, so no room is added."""
    fry_db, spray_db = curves(SIZZLE)
    pressure_db, grit_db, paste_db = strokes(fry_db)
    metal = scrape(pressure_db, grit_db, paste_db) + knocks() + clinks() + skids() + rim()
    paste = draw() + smears() + squelches() + plops()
    frying = sizzle(fry_db, spray_db, grit_db)
    return (metal + paste + frying + ticks() + air() + whistle())[None]


TOP_HZ = 15750  # upper limit of the microphone


def record(dry):
    """The microphone sheds the deepest rumble and cuts the top steeply."""
    low_cut = signal.butter(2, 36, "highpass", fs=SR, output="sos")
    top_cut = signal.ellip(10, .2, 70, TOP_HZ, fs=SR, output="sos")
    return signal.sosfilt(top_cut, signal.sosfilt(low_cut, dry))


dry = scene()
out = record(dry)
unload_audio(out)
```